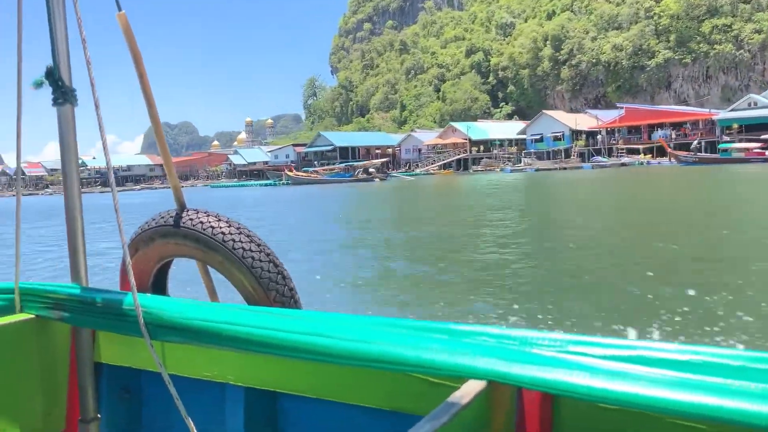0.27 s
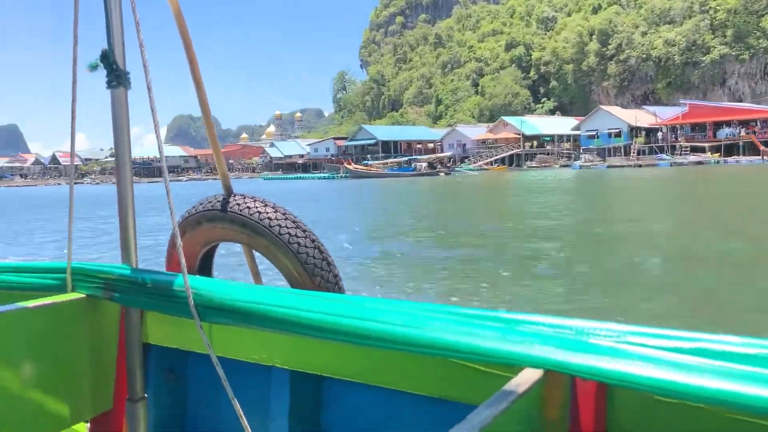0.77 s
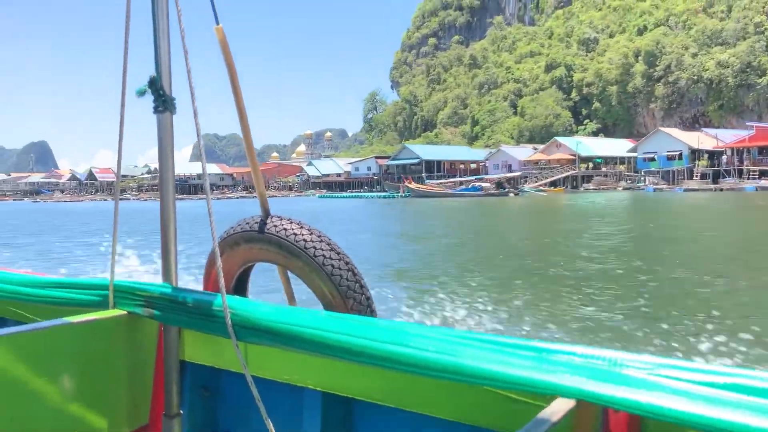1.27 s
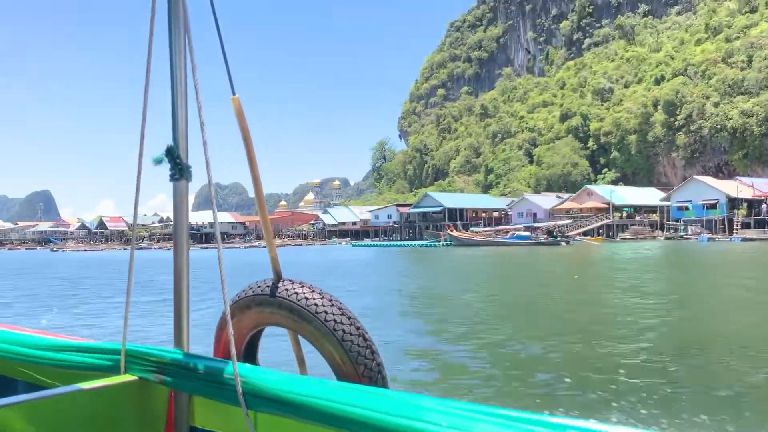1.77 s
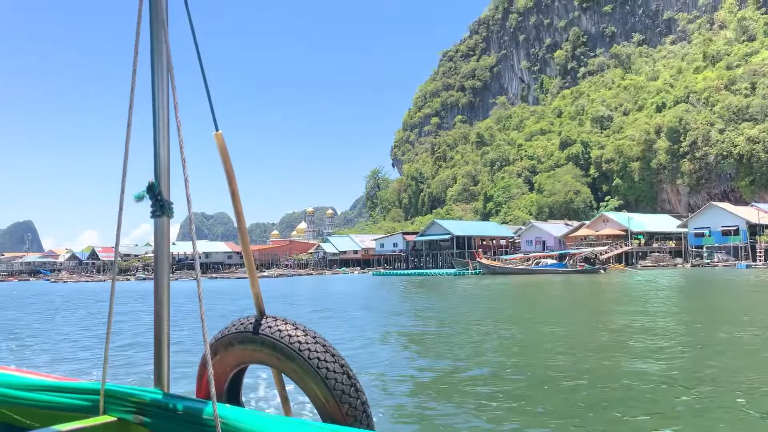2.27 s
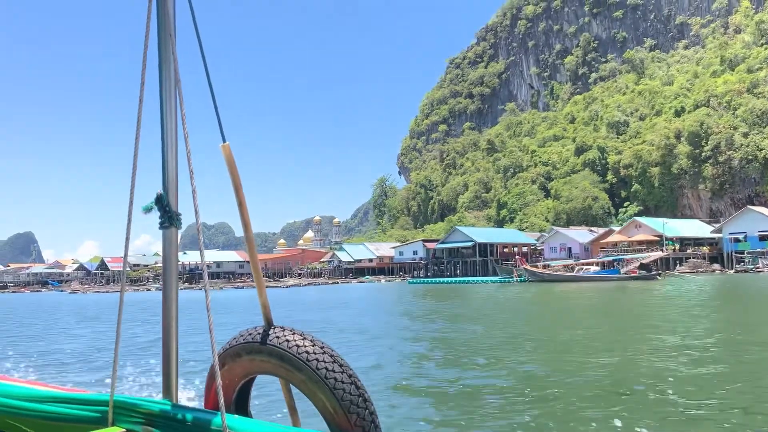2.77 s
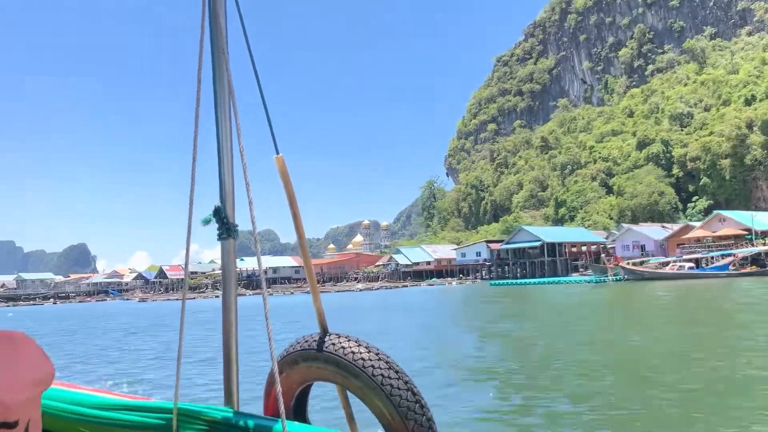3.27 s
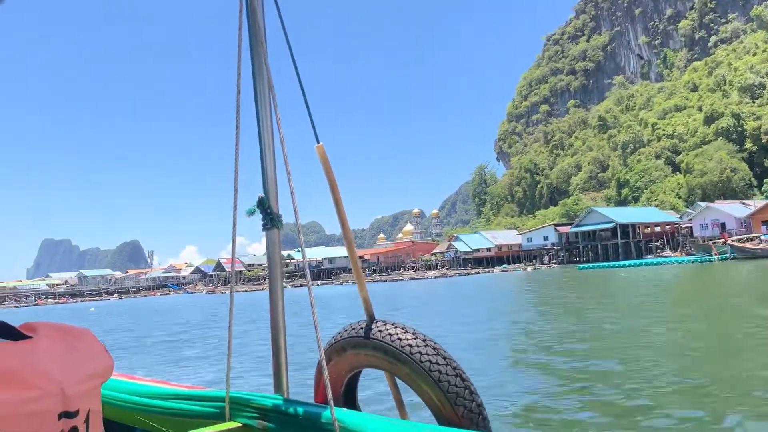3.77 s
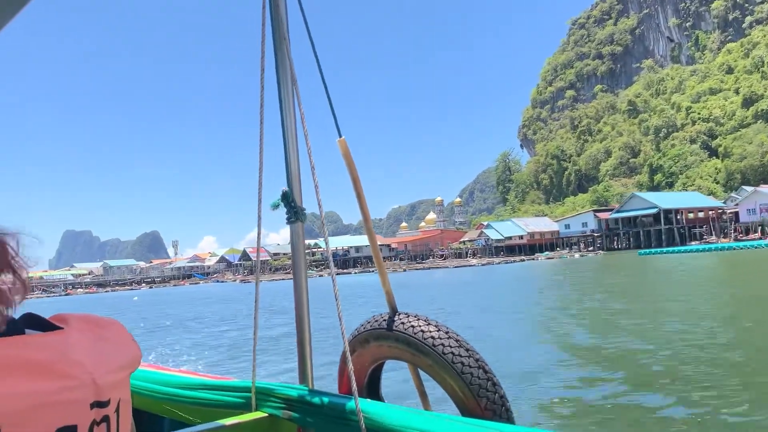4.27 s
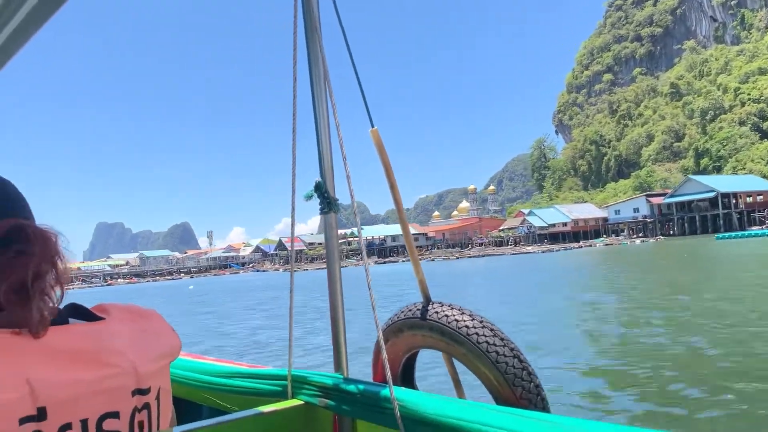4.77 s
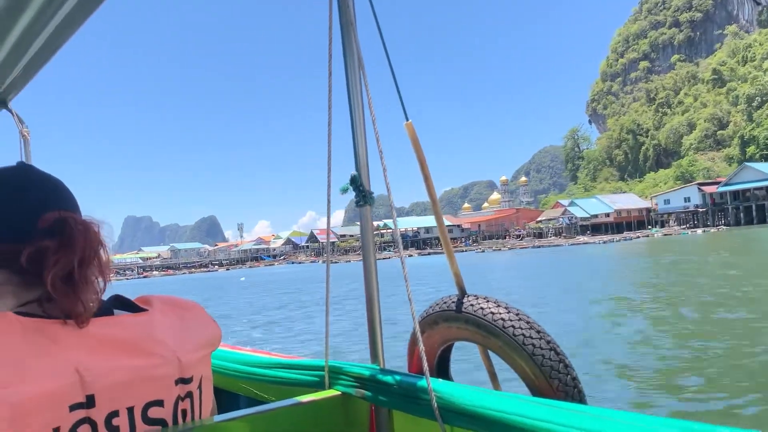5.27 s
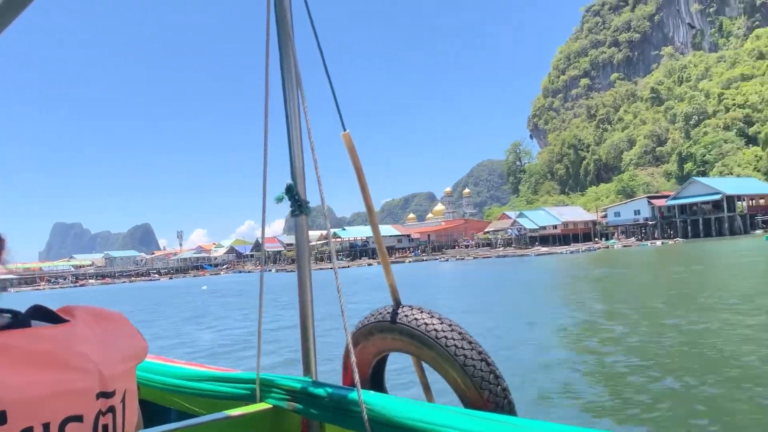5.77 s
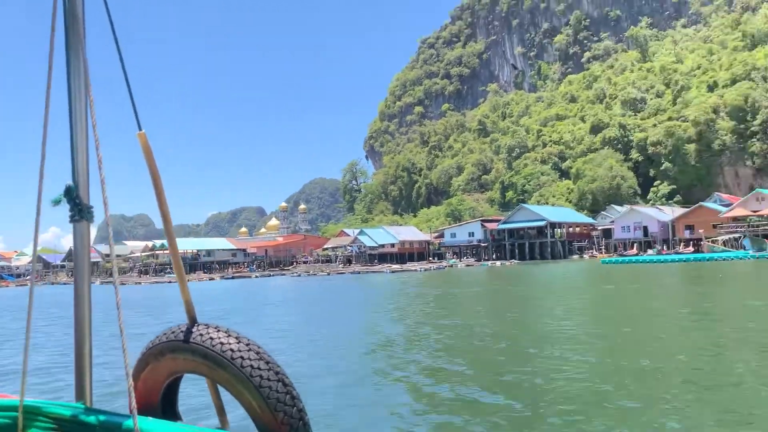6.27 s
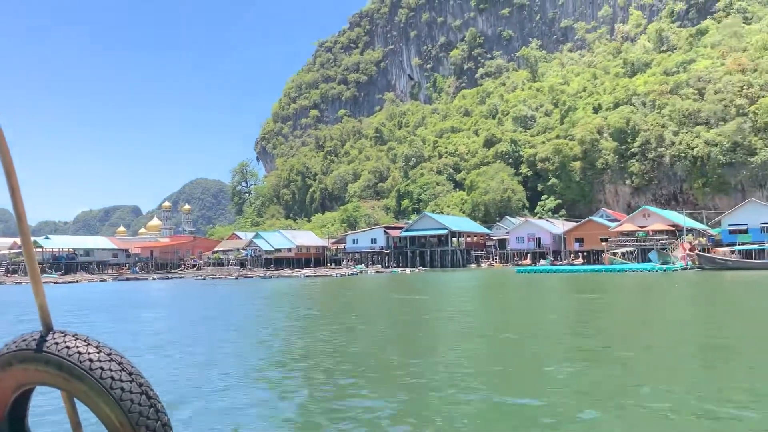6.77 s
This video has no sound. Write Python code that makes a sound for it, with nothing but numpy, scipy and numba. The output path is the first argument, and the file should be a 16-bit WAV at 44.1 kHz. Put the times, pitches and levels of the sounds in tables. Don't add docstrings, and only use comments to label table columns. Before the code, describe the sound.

On board a wooden motor boat in open air, close and wide in stereo, with low windy buffeting. From 0 s a strong engine drone and rattle mix with loud hissing bow spray, sloshing water and heavy hull thumps; dull knocks fall near 0, 0.4, 0.8 and 1.1 s. The engine briefly rises and barks around 1 s, then pulls again at 1.7 and 2.2 s, while a quick cluster of plank raps comes at 2 s. Spray fades steadily and the drone slides lower from 2.5 to 4 s, with a bark near 3.4. A sharp crack with a deep thud and tiny bounces strikes at 4.3 s. Thereafter, soft bubbling wash and a slow throb remain. Raps at 5.2-5.3 s meet a low splash and another blip; faint drips tick. Further blips come at 6.1 and 6.9 s, with a faint tap near 6.6.

```python
import sys
import numpy as np
from scipy import signal
from scipy.fft import rfft, irfft
from scipy.io import wavfile
from scipy.ndimage import uniform_filter1d
from numba import njit

SR = 44100
rng = np.random.default_rng(int(sys.argv[2]) if len(sys.argv) > 2 else 0)


def output_pcm(signal):
    pcm = np.clip(np.atleast_2d(signal).T, -1, 1) * 32767
    wavfile.write(sys.argv[1], SR, np.round(pcm).astype(np.int16))


def invert_db(level):
    return 10 ** (np.asarray(level, dtype=float) / 20)


N = 308700

# start_s, firing_rate_hz, load_db (firing line), bark_db (upper multiples)
ENGINE_RUN = [(0, 74.9, -31.5, -37), (.3, 78.3, -29, -46), (.5, 76.94, -31, -42), (.9, 80.49, -32, -32),
              (1.18, 87.46, -28, -34.5), (1.42, 72.2, -24.5, -45), (1.9, 71.9, -23.5, -35.5),
              (2.42, 72, -30.5, -28.5), (3.0, 62.47, -25.5, -30), (3.5, 55.3, -38, -35.5),
              (4.0, 51.44, -38.5, -34), (5.1, 47.07, -28, -32.5), (5.54, 56.43, -27, -32),
              (5.96, 49.87, -32, -29), (6.34, 56.73, -29, -32), (6.52, 51.47, -34, -36.5),
              (6.75, 46.7, -28.5, -29.5), (7, 52.07, -30, -27)]
# start_s, hold_s, load_lift_db, bark_lift_db, uneven_lift_db
THROTTLE_BLIPS = [
    (-.1, .48, 13, -2.5, 11),
    (.95, 0.29, 7, 10, -12),
    (1.72, 0.36, 4, 2.5, 4),
    (2.18, 0.43, 6.5, 5, 4.5),
    (3.42, 0.29, 0.5, 6.5, -1),
    (5.375, 0.366, 4, 6, -1),
    (6.082, 0.35, 7.5, 7, -4),
    (6.882, .3, 5, 5.5, 3),
]
BLIP_EDGE_S = 0.065
# multiple of firing rate, level_db
UNEVEN_LINES = [(0.749, -7), (1.25, 0.5), (1.5, 2), (1.75, -6.5), (2.5, -14.5)]
UNEVEN_DB, UNEVEN_WANDER_DB = -38, 3
# pitch_hz, level_db
EXHAUST_PIPE = [(90, 1.5), (125, -3.5), (165, -0.5), (182, -1), (210, -16), (240, -14.5), (330, -24),
                (520, -37)]
# pitch_hz, level_db (per Hz)
RATTLE_COLOUR = [(250, -49), (400, -5), (700, -9.5), (1100, -6.5), (1750, -5.5), (1950, -18.5),
                 (3000, -7.5)]
# pitch_hz, width_hz, level_db
BLOCK_MODES = [(630, 47, 8.5), (790, 49, 6), (971, 39, 8.5), (1203, 97, 4.5), (1403, 77, 5.5),
               (1646, 25, 5)]
RATTLE_DB, RATTLE_PER_LOAD, RATTLE_PER_WASH = -32, 0.14, 0.39

# peak_s, rumble_db, slap_db
HULL_WAVES = [(0, -11.5, -34), (.22, -17, -40), (.4, -27, -27.5), (.6, -17.5, -23), (1.02, -16.5, -29),
              (1.25, -25, -23), (1.75, -14.5, -30), (2.0, -13.5, -26), (2.25, -18.5, -32), (2.5, -28, -34),
              (2.77, -11.5, -26.5), (3.12, -22.5, -36), (3.38, -23.5, -43), (3.72, -20.5, -35),
              (4.22, -21.5, -36), (4.48, -25, -32.5), (4.75, -26, -32.5), (5.22, -14.5, -30),
              (5.48, -27, -35), (5.92, -18.5, -35), (6.25, -19, -30), (6.6, -15.5, -28), (7, -22, -28)]
WAVE_RISE_S, WAVE_FALL_S = 0.099, 0.12
CHOP_RUMBLE_DB, CHOP_SLAP_DB, CHOP_PER_SPRAY = -25.5, -34.5, 0.42
# pitch_hz, level_db (per Hz)
RUMBLE_COLOUR = [(25, -12), (54, -0.5), (102, 2), (152, -4), (231, -23.5), (260, -22), (340, -26),
                 (570, -120)]
# pitch_hz, level_db (per Hz)
SLAP_COLOUR = [(120, -15.5), (200, 3), (260, -3.5), (320, -6.5), (370, -9.5), (500, -7.5), (700, -27)]
# pitch_hz, width_hz, level_db
PLANK_MODE = [(286, 35, 6.5)]
# pitch_hz, level_db (per Hz)
SLOSH_COLOUR = [(240, -25), (330, -1), (550, -1), (800, -7.5), (1100, -5), (1500, -25)]
SLOSH_DB, SLOSH_PER_SPRAY, SPRAY_FULL_DB = -29.5, 2.7, -29.5

# start_s, peak_db, start_hz, end_hz, length_s
GEAR_KNOCKS = [
    (0.033, -17, 313, 291, 0.018),
    (0.376, -21, 314, 306, .027),
    (4.317, -12, 614, 398, .0031),
    (4.3218, -7.5, 530, 202.7, 0.0044),
    (4.3273, -9, 150, 62.5, 0.015),
    (4.386, -21, 330, 120, 0.015),
    (4.431, -17, 331.5, 120, 0.01),
    (6.621, -34, 600, 566, .023),
]
# start_s, peak_db
PLANK_RAPS = [(0.427, -15), (0.799, -19), (1.121, -17), (1.258, -26), (1.972, -14), (2.024, -12),
              (2.056, -11.5), (2.085, -16), (2.481, -19), (2.799, -15), (3.35, -21), (5.151, -24),
              (5.198, -16), (5.233, -16), (5.339, -11.5), (6.639, -25)]
RAP_START_HZ, RAP_END_HZ, RAP_S = 498, 100.4, 0.0175

# start_s, spray_db
BOW_SPRAY = [(0, -29), (.33, -29.5), (.52, -32), (.8, -33), (1.2, -37.5), (1.4, -36.5), (1.9, -40.5),
             (2.7, -44.5), (2.97, -43), (3.9, -47), (4.4, -48), (4.9, -48.5), (5.42, -47), (5.9, -47),
             (6.8, -49), (7, -48.5)]
# pitch_hz, level_db (per Hz)
SPRAY_COLOUR = [(4000, -19), (6500, -0.5), (8500, -1.5), (11000, -3), (13300, -6.5), (15700, -8)]
# pitch_hz, level_db (per Hz)
WASH_COLOUR = [(1300, -6), (2000, 1.5), (2700, -1), (3500, 4.5), (5000, 1.5), (6500, -8.5), (9000, -23)]
# pitch_hz, width_hz, level_db
GUNWALE_MODES = [(2450, 73, 5), (2660, 67, 4), (3500, 30, 3)]
WASH_DB, WASH_PER_SPRAY, SPRAY_REST_DB = -40, 0.61, -49.5
# peak_s, length_s, froth_hz, froth_db (against the wash), wash_lift_db
SIDE_SPLASHES = [
    (0.137, .25, 3680, -20, 2.3),
    (0.46, 0.41, 3600, -6, 1.4),
    (1.07, 0.11, 4500, -18, 3.5),
    (1.477, 0.27, 6140, -0.5, 0.1),
    (1.9, 0.35, 5140, -5, 2),
    (2.6, 0.32, 3950, -2.5, 0.5),
    (3.303, 0.45, 4000, -4, -0.3),
    (5.36, 0.26, 2070, 4, 2),
    (6.208, 0.16, 3040, 0, 2.5),
    (6.99, 0.25, 2700, 5.5, -1.2),
]
FROTH_WIDTH_HZ, UPPER_BAND_HZ = 1600, 5120
UPPER_BAND_DB, UPPER_REST_DB = -10.5, -22.5
# start_s, peak_db, pitch_hz
RAIL_DROPS = [
    (4.98, -35, 5600),
    (5.10, -35, 5800),
    (5.18, -33, 5400),
    (5.408, -29, 5700),
    (6.21, -39, 4550),
    (6.83, -32, 6500),
    (6.911, -34, 5933),
]

STERN, BOW = (6.03, 1.14), (9.28, -2.04)
BEAM = (1.96, 2.65)
# low_hz, high_hz, depth_db
THIN_SUM = [(8270, 8960, -8), (13090, 13780, -11)]
# low_hz, high_hz, depth_db
THIN_DIFFERENCE = [(10340, 11710, -12), (15160, 17000, -19)]
TOP_HZ = 15680


def engine():
    hz, load_db, bark_db, uneven_db = throttle()
    turns = np.cumsum(hz * (1 + 0.0055 * walk(24.6))) / SR
    pipe_hz, pipe_db = np.transpose(EXHAUST_PIPE)
    lines = [(1, load_db + 2.7)]
    for k in range(2, 7):
        lines.append((k, bark_db + np.interp(np.log(k * hz), np.log(pipe_hz), pipe_db)))
    lines += [(k, uneven_db + db) for k, db in UNEVEN_LINES]
    drone = np.zeros(N)
    for k, db in lines:
        level = np.sqrt(2) * invert_db(db + 0.95 * walk(18))
        drone += level * np.sin(2 * np.pi * (k * turns + rng.random()))
    beat = 1 + 0.072 * np.cos(2 * np.pi * turns)
    rattle_db = RATTLE_DB + RATTLE_PER_LOAD * (load_db + 26) + RATTLE_PER_WASH * (wash_level() + 35)
    rattle = beat * bands(RATTLE_COLOUR, 0.53, STERN, 1.0, 18, 0.66, BLOCK_MODES) * invert_db(rattle_db)
    return ports(drone, 0, 0.81, STERN) + rattle


def throttle():
    t = np.arange(N) / SR
    hz, load_db, bark_db = curve(ENGINE_RUN)
    uneven_db = UNEVEN_DB + UNEVEN_WANDER_DB * walk(4)
    for s, hold, more_load_db, more_bark_db, more_uneven_db in THROTTLE_BLIPS:
        opened = np.clip(np.minimum(t - s, s + hold - t) / BLIP_EDGE_S + 0.5, 0, 1)
        load_db = load_db + more_load_db * opened
        bark_db = bark_db + more_bark_db * opened
        uneven_db = uneven_db + more_uneven_db * opened
    return uniform_filter1d(hz, SR // 10), load_db, bark_db, uneven_db


def hull():
    s, rumble_db, slap_db = np.transpose(HULL_WAVES)
    spray_db = curve(BOW_SPRAY)[0]
    chop_db = CHOP_PER_SPRAY * (spray_db - SPRAY_REST_DB)

    def heave(wave_db, rest_db):
        return np.sqrt(invert_db(2 * (rest_db + chop_db)) + swells(s, invert_db(2 * wave_db), WAVE_RISE_S, WAVE_FALL_S))

    rumble = bands(RUMBLE_COLOUR, 0.73, STERN, 1.0, 26, 2.8) * invert_db(-4.0)
    slap = bands(SLAP_COLOUR, 0.44, STERN, 1.8, 30, 1.85, PLANK_MODE) * invert_db(-2.74)
    slosh = bands(SLOSH_COLOUR, 0.4, STERN, 2.2, 30, 1.8)
    slosh = slosh * invert_db(SLOSH_DB + SLOSH_PER_SPRAY * (spray_db - SPRAY_FULL_DB))
    return rumble * heave(rumble_db, CHOP_RUMBLE_DB) + slap * heave(slap_db, CHOP_SLAP_DB) + slosh


def knocks():
    out = np.zeros(N)
    t = np.arange(SR // 5) / SR
    tick = np.exp(-t / 0.016) * svf(rng.standard_normal(len(t)), np.full(len(t), 1200.), 1100.0)
    raps = [(s, db, RAP_START_HZ, RAP_END_HZ, RAP_S) for s, db in PLANK_RAPS]
    for s, db, start_hz, end_hz, length in list(GEAR_KNOCKS) + raps:
        hz = end_hz + (start_hz - end_hz) * np.exp(-t / (0.238 * length))
        shape = (1 - np.exp(-t / (0.15 * length))) ** 2 * np.exp(-t / length)
        sweep = shape / shape.max() * np.cos(2 * np.pi * np.cumsum(hz) / SR)
        i = int((s - 0.001) * SR)
        out[i:i + len(t)] += invert_db(db) * (sweep + invert_db(-19) * (start_hz / 640) ** 2 * tick)
    return np.array([out, out])


def water():
    wash = bands(WASH_COLOUR, 0.23, BEAM, 0.61, 7, 0.27, GUNWALE_MODES) * invert_db(0.6)
    fizz = invert_db(-7.0) * bubbles(count=3000, lo_hz=1504, hi_hz=6500, cycles=24.6, spread_db=3.5)
    spray = bands(SPRAY_COLOUR, 0.45, BOW, 0.6, 14, 0.5) * invert_db(curve(BOW_SPRAY)[0] + 0.5)
    return (wash + fizz + froth()) * invert_db(wash_level() - 2.5) + spray


def wash_level():
    s, length, _, _, lift_db = np.transpose(SIDE_SPLASHES)
    steady_db = WASH_DB + WASH_PER_SPRAY * (curve(BOW_SPRAY)[0] - SPRAY_REST_DB)
    return steady_db + swells(s, lift_db, length, length)


def froth():
    def band(hz):
        centre, width = np.full(N, 1. * hz), 1. * FROTH_WIDTH_HZ
        rows = [svf(svf(row, centre, width), centre, width) for row in rng.standard_normal((2, N))]
        return unit(np.array(rows)) * invert_db(1.1 * walk(14) + 1.6 * walk(35))

    own, together = 0, 0
    for s, length, hz, db, _ in SIDE_SPLASHES:
        swell = swells([s], invert_db(db), length, 1.3 * length)
        own = own + band(hz) * swell
        together = together + swell
    return own + band(UPPER_BAND_HZ) * (invert_db(UPPER_REST_DB) + invert_db(UPPER_BAND_DB) * together)


def bubbles(count, lo_hz, hi_hz, cycles, spread_db):
    out = np.zeros((2, N + SR))
    for place, pitch, size, side in rng.random((count, 4)):
        hz = lo_hz * (hi_hz / lo_hz) ** pitch
        t = np.arange(int(3 * cycles * SR / hz)) * hz / SR / cycles
        ring = t * np.exp(-2 * t) * np.sin(2 * np.pi * cycles * (t + 0.016 * t ** 2))
        level = invert_db(-spread_db * np.log(size + 0.094))
        i = int(place * N)
        out[:, i:i + len(t)] += level * np.outer([side + 0.25, 1.3 - side], ring)
    return unit(out[:, :N])


def drops():
    out = np.zeros(N)
    t = np.arange(SR // 50) / SR
    shape = np.e * t / 0.0017 * np.exp(-t / 0.0015)
    for s, db, hz in RAIL_DROPS:
        i = int(s * SR)
        out[i:i + len(t)] += invert_db(db) * shape * np.sin(2 * np.pi * hz * t)
    return np.array([0.65 * out, 1.0 * out])


def bands(colour, alike, side, flicker_db, rate, shared_db, modes=()):
    hz = np.arange(1, N // 2 + 2) * SR / N
    at, db = np.transpose(colour)
    gain = invert_db(np.interp(np.log(hz), np.log(at), db, -80, -80))
    for centre, width, peak_db in modes:
        gain = gain * (1 + (invert_db(peak_db) - 1) / (1 + (2 * (hz - centre) / width) ** 2))
    noise = ports(rng.standard_normal(N), rng.standard_normal((2, N)), alike, side)
    source = rfft(noise) * gain
    out, surge = 0, shared_db * walk(rate)
    for step in np.arange(np.floor(2 * np.log2(at[0])), 2 * np.log2(at[-1]) + 1):
        window = np.cos(np.pi / 2 * np.clip(2 * np.log2(hz) - step, -1, 1)) ** 2
        out = out + irfft(source * window, N) * invert_db(surge + flicker_db * walk(rate))
    return unit(out)


def ports(near, far, alike, side):
    hz = np.arange(N + 1) * SR / (2 * N)
    turn = 2 * np.pi * hz / SR * side[0] + side[1] * hz / (hz + 350)
    late = irfft(rfft(np.r_[near, near[::-1]]) * np.exp(-1j * turn))[:N]
    alike = np.clip(alike, 0, 1)
    return np.sqrt(alike) * np.array([late, near]) + np.sqrt(1 - alike) * far


@njit
def svf(x, hz, width):
    y, band, low = np.empty(len(x)), 0., 0.
    for i in range(len(x)):
        g, k = np.tan(np.pi * hz[i] / SR), width / hz[i]
        v = (band + g * (x[i] - low)) / (1 + g * (g + k))
        band, low, y[i] = 2 * v - band, low + 2 * g * v, k * v
    return y


def swells(times, sizes, rise_s, fall_s):
    t = np.arange(N) / SR
    return sum(size * np.exp(-((t - s) / np.where(t < s, up, down)) ** 2)
               for s, size, up, down in np.broadcast(times, sizes, rise_s, fall_s))


def walk(rate):
    k = int(SR / rate)
    held = np.repeat(rng.standard_normal(N // k + 1), k)
    return 1.29 * uniform_filter1d(uniform_filter1d(held, k), k)[:N]


def curve(table):
    s, *columns = np.transpose(table)
    return [np.interp(np.arange(N) / SR, s, c) for c in columns]


def unit(x):
    return x / np.sqrt(np.mean(x ** 2))


def thinned(x, spans, open_db):
    hz, full = np.arange(N + 1) * SR / (2 * N), rfft(np.r_[x, x[::-1]])
    for lo, hi, depth_db in spans:
        part = irfft(full * ((hz > lo) & (hz < hi)))[:N]
        x = x - part * (1 - invert_db(np.minimum(depth_db + open_db + 6 * walk(24), 0)))
    return x


def scene():
    return engine() + hull() + knocks() + water() + drops()


def top_cut(x):
    return signal.sosfilt(signal.butter(12, 17100, fs=SR, output="sos"), x)


def record(dry):
    dry = signal.sosfilt(signal.butter(4, 38, "high", fs=SR, output="sos"), dry)
    dry = signal.sosfilt(signal.ellip(10, 0.2, 70, TOP_HZ, fs=SR, output="sos"), dry)
    dry = np.tanh(1.088 * dry) / 1.103
    first_spray_db = np.interp(np.arange(N) / SR, [0.4, 0.5], [10, 0])
    mid = thinned(dry[0] + dry[1], THIN_SUM, first_spray_db) / 2
    side = thinned(dry[0] - dry[1], THIN_DIFFERENCE, 0) / 2 * invert_db(-0.15)
    return top_cut(np.array([mid + side, mid - side]))


dry = scene()
out = record(dry)
output_pcm(out)
```